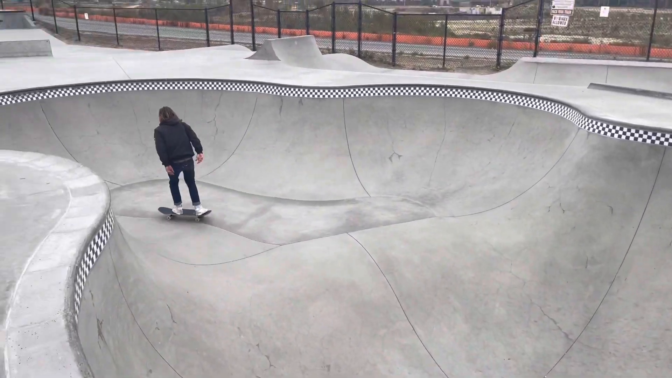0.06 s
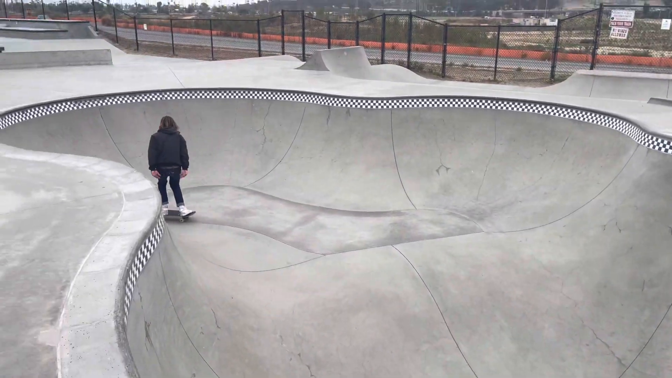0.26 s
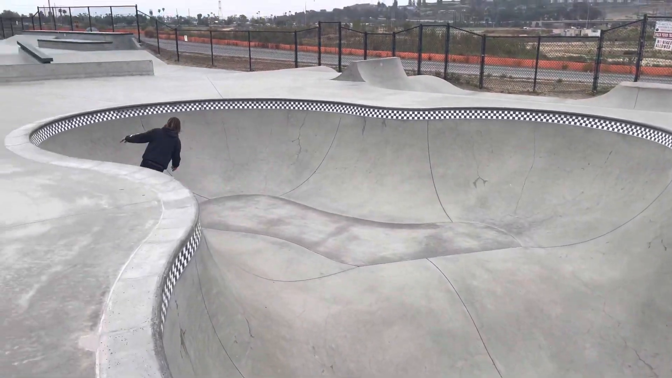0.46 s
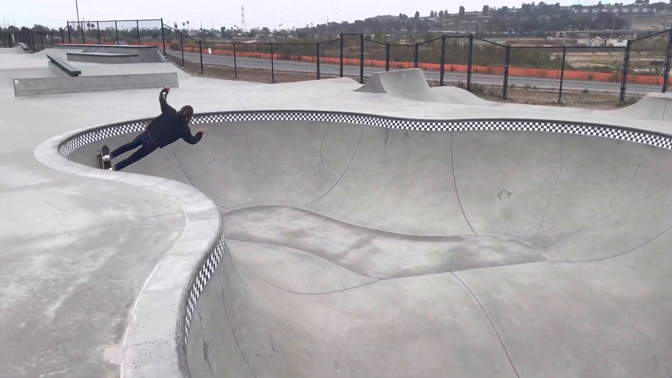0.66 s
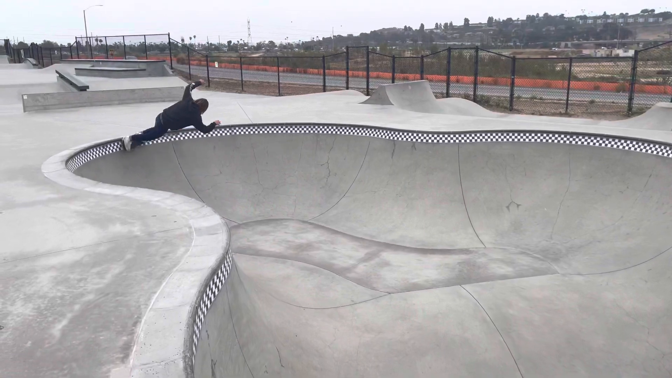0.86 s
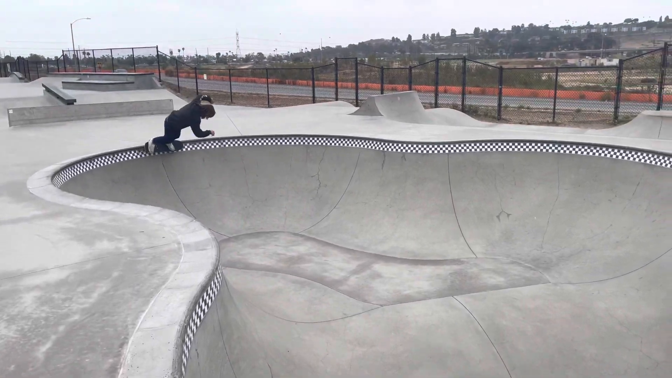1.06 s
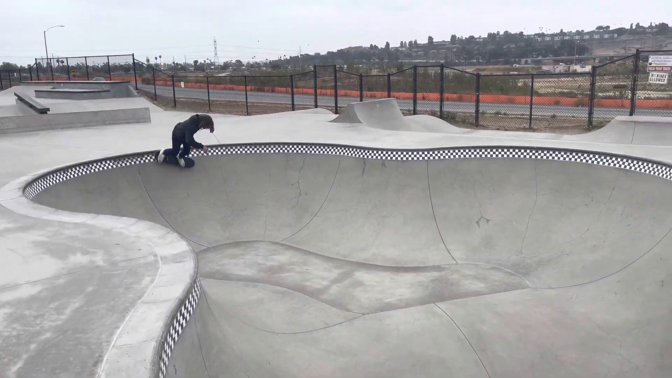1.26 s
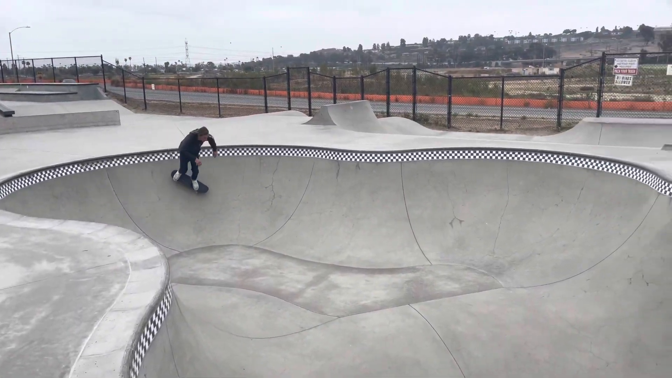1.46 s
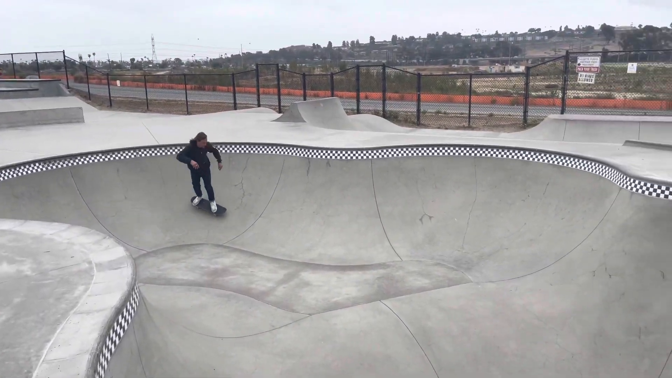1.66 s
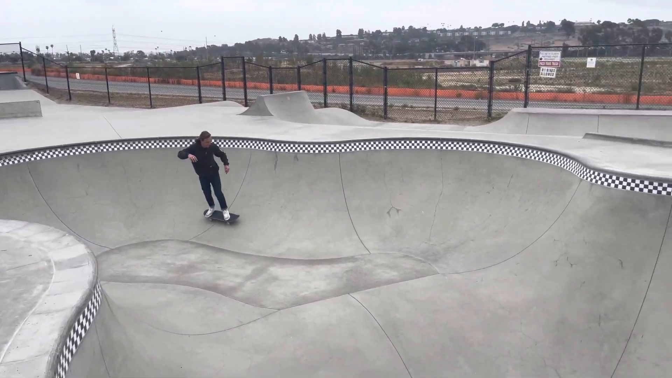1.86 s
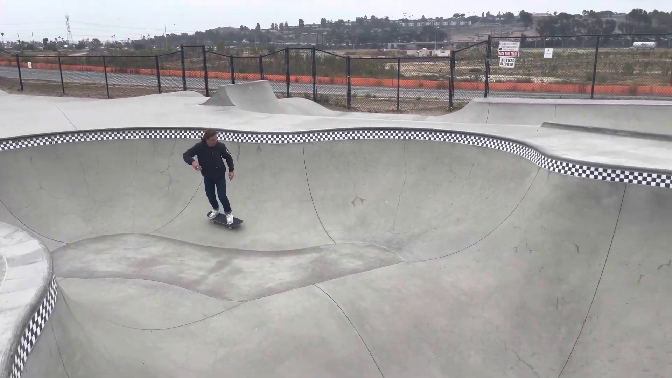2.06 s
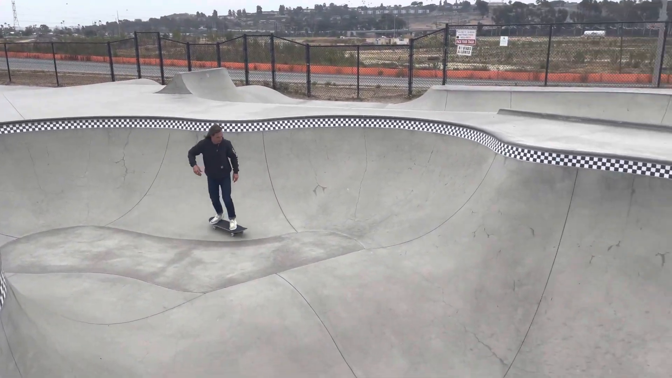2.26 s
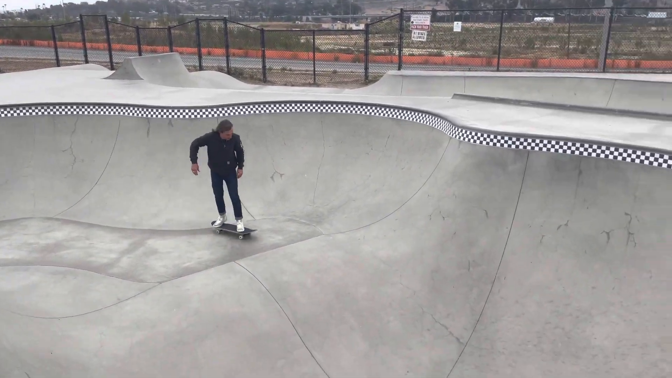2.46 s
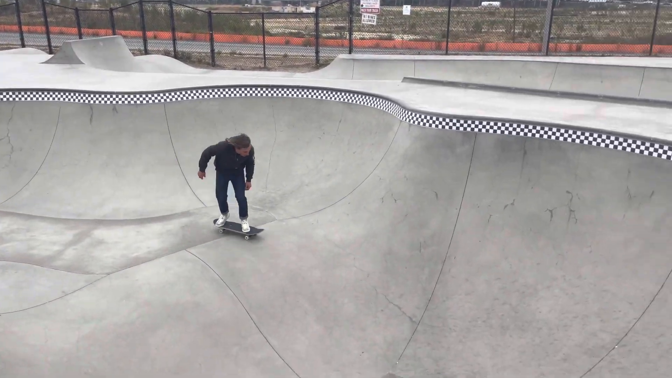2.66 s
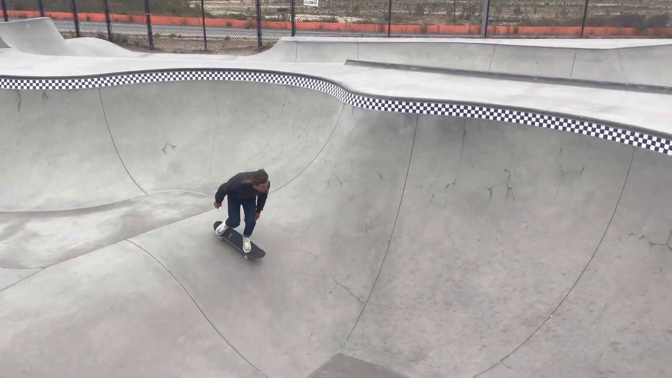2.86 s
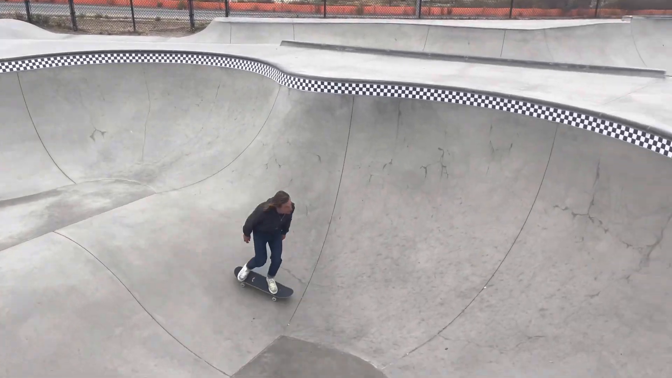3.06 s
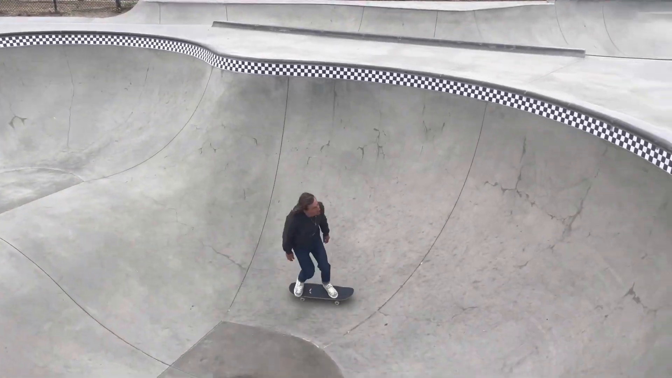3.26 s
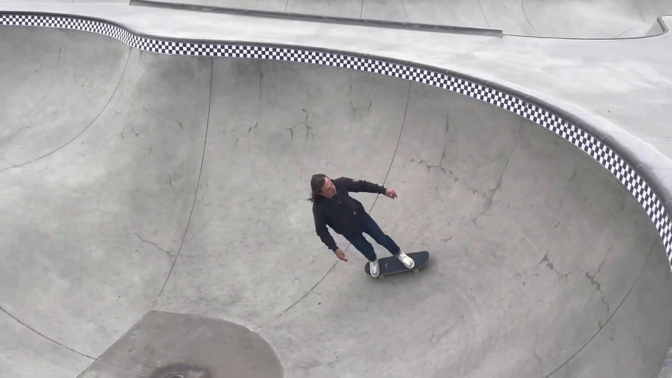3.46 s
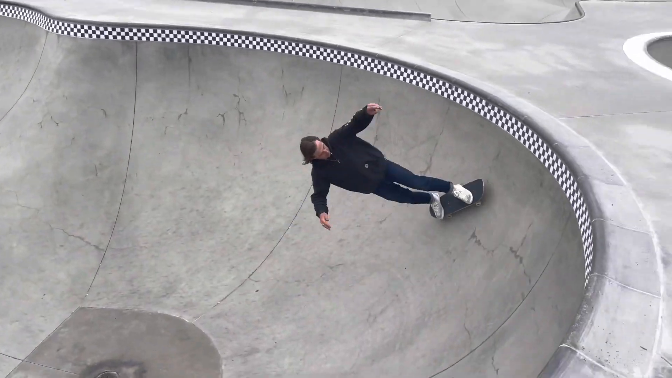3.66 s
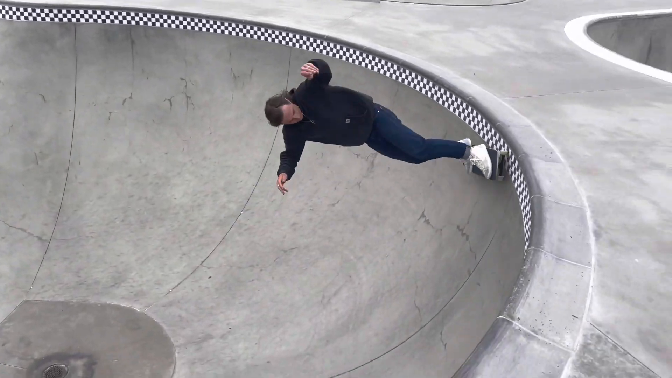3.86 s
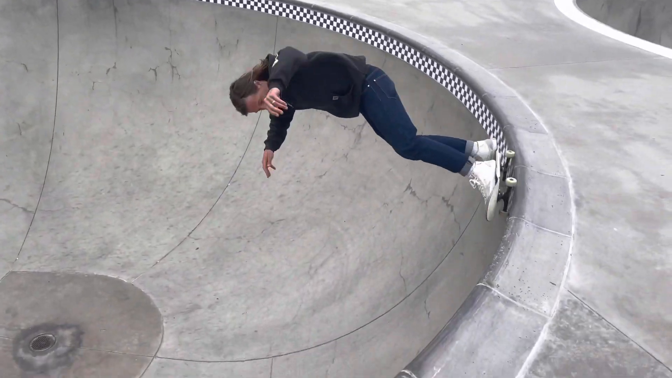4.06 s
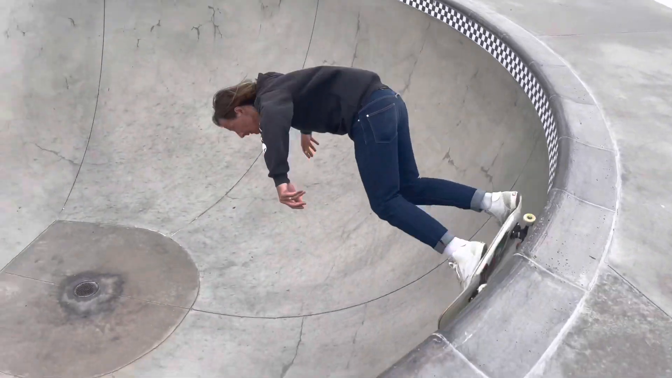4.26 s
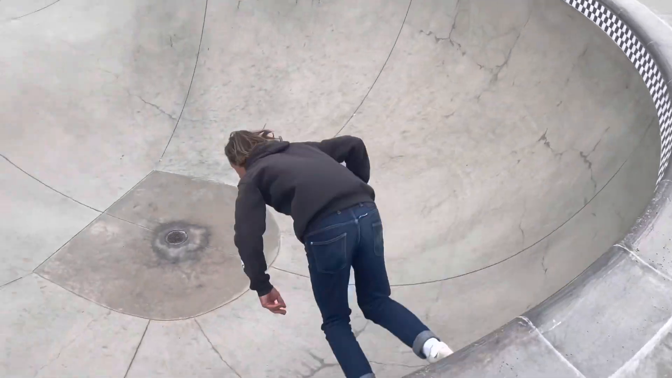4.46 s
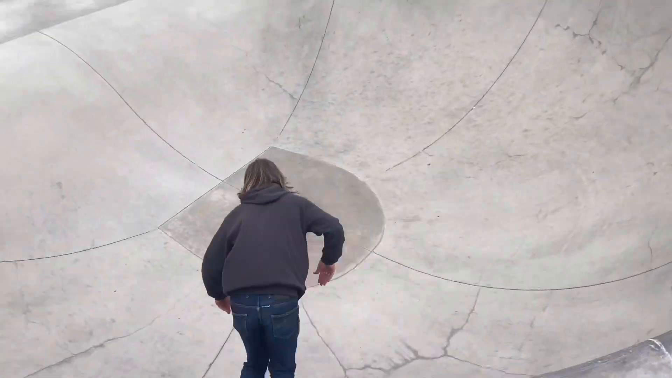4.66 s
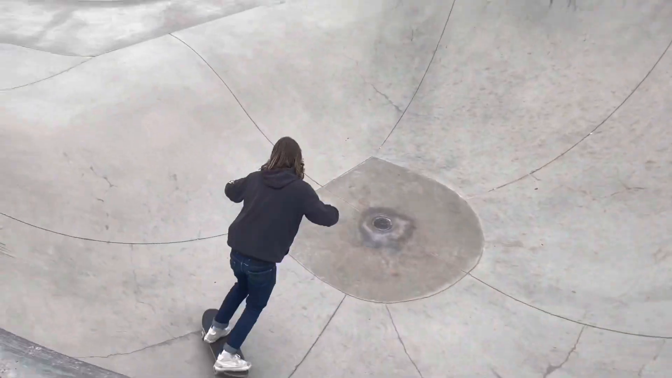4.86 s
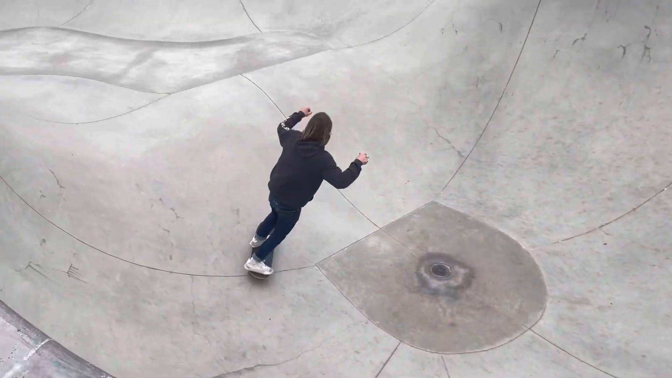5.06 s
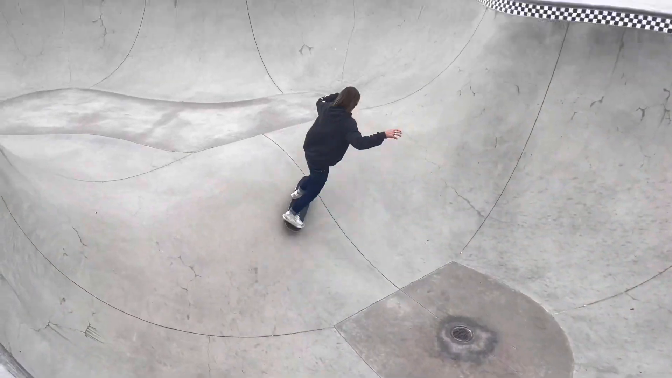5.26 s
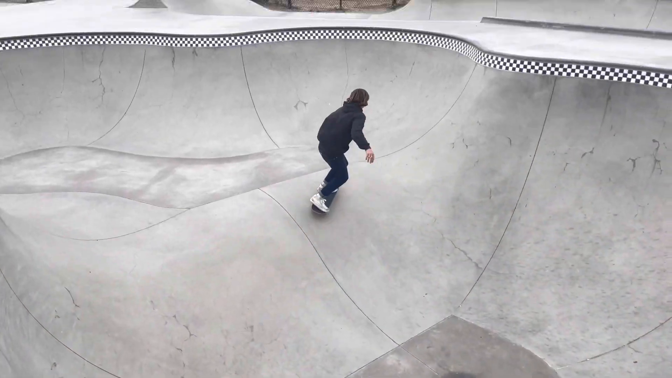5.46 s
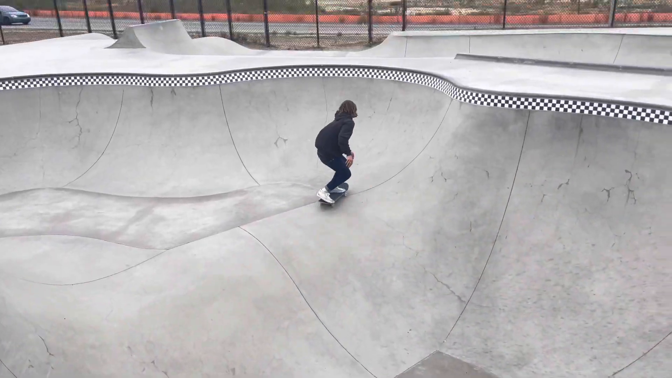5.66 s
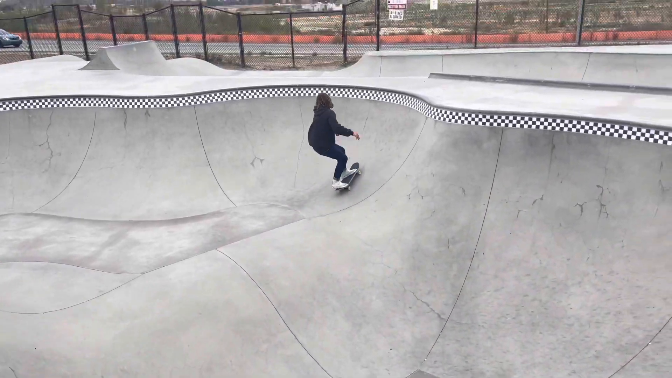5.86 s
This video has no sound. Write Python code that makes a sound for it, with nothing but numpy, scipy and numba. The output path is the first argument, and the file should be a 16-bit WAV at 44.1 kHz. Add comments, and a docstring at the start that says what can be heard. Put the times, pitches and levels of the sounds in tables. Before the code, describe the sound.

Skateboard wheels roll in a concrete bowl, rasp loudly along tiled coping at one second, then swell into knocks and a scrape around four.

```python
"""In a concrete bowl, a skateboard carves round below a hand-held phone.
Grit under the wheels shakes the deck and trucks (random taps through resonances); joints and coping
tiles knock them (short pushes through the same resonances); bearings and sliding urethane hiss.
The curved walls scatter the board's sound as dense echoes. A light wind buffets the two microphone ports
with rumble and puffs, over faint breathy whistles and a distant outdoor wash of noise."""
import sys
import numpy as np
from scipy import signal
from scipy.fft import rfft, irfft
from scipy.io import wavfile
from scipy.ndimage import uniform_filter1d, map_coordinates
from numba import njit

SR = 44100
rng = np.random.default_rng(int(sys.argv[2]) if len(sys.argv) > 2 else 0)


def unload_wav(signal):
    """Save mono or channel-first audio to the path in sys.argv[1] as 16-bit WAV at rate SR, clipped to [-1, 1]."""
    wavfile.write(
        sys.argv[1],
        SR,
        np.round(np.clip(np.atleast_2d(signal).T, -1, 1) * 32767).astype(np.int16),
    )


N = 260631
T = np.arange(N) / SR

# the board along the ride, before small trims: (t/s, low deck modes/dB, high deck modes/dB, trucks/dB)
RIDE = [(0.0, -36, -36, -40), (0.05, -40, -48, -46), (0.3, -39, -47, -40), (0.45, -39, -48, -46),
        (0.55, -35, -43, -42), (0.773, -35, -40, -38), (0.779, -24.5, -33.5, -35), (0.835, -26.5, -33, -33),
        (0.86, -22, -28, -28), (0.95, -21.5, -14.5, -31), (1.08, -18.5, -17.5, -18),
        (1.17, -20, -16.5, -26.5), (1.25, -35, -44, -40), (1.32, -34.5, -37, -36), (1.45, -30, -42, -38),
        (1.54, -30, -30, -33), (1.6, -32.5, -31, -31), (1.7, -29.5, -37, -38), (1.78, -33.5, -37, -35),
        (1.92, -37, -40, -42), (2.16, -36.5, -41.5, -46), (2.3, -34.5, -34.5, -38.5), (2.65, -44, -58, -54),
        (2.85, -28, -45, -45), (3.03, -28.5, -33, -33), (3.3, -26, -27.5, -29.5), (3.56, -24, -29, -31),
        (3.8, -28, -30.5, -29.5), (3.9, -25.5, -34, -28.5), (4.03, -25.5, -32, -28.5),
        (4.1, -20.5, -23.5, -23), (4.135, -21, -27, -26), (4.17, -18.5, -22, -25.5),
        (4.27, -28.5, -30.5, -30.5), (4.4, -34.5, -34.5, -43), (4.64, -37.5, -40, -44),
        (4.72, -36.5, -34, -41.5), (4.77, -31, -31.5, -42), (4.85, -30, -31, -38),
        (4.89, -28.5, -21.5, -40), (4.96, -21, -22.5, -39), (5.07, -22, -19, -31),
        (5.14, -19.5, -23.5, -34.5), (5.2, -23, -31, -36.5), (5.27, -26.5, -29, -29.5),
        (5.34, -25, -37, -35.5), (5.42, -27, -31, -35.5), (5.6, -37.5, -43, -37.5),
        (5.91, -31.5, -34.5, -34.5)]
# wheels over joints and edges: (t/s, blow level/dB, colour f/Hz)
KNOCKS = [(0.521, -27, 610), (0.778, -17, 850), (0.846, -18, 546), (0.862, -22, 590), (1.208, -12.5, 507),
          (1.218, -19, 600), (1.234, -19, 528), (1.27, -15.5, 630), (1.353, -13, 560), (1.365, -18, 545),
          (1.376, -15, 530), (1.413, -15, 527), (1.509, -20, 636), (1.534, -22, 830), (1.871, -23.5, 700),
          (1.954, -16, 745), (2.482, -22, 496), (2.76, -24, 610), (2.962, -16, 1300), (3.111, -29, 540),
          (3.153, -10, 870), (3.203, -6.5, 950), (3.208, -13, 1800), (3.275, -33, 641), (3.343, -10, 754),
          (3.408, -9, 750), (3.46, -14, 800), (3.485, -17, 850), (3.508, -15, 650), (3.525, -16, 690),
          (3.546, -14, 800), (3.568, -16, 1050), (3.709, -18, 993), (3.92, -10, 1450), (3.938, -20, 1450),
          (3.955, -10.5, 1530), (3.964, -8, 1510), (3.989, -9, 890), (4.006, -6.5, 800), (4.146, -8, 950),
          (4.152, -12, 1050), (4.18, -4.5, 1040), (4.302, -15, 1090), (4.325, -15, 476), (4.339, -25, 230),
          (4.358, -24, 597), (4.378, -24, 510), (4.39, -22, 445), (4.398, -20, 403), (4.432, -22, 496),
          (4.868, -23, 1070), (4.901, -17, 1020), (4.943, -21, 960), (4.962, -17, 950), (4.997, -17, 756),
          (5.040, -2, 930), (5.049, -24, 1040), (5.088, -15, 1160), (5.12, -24, 800), (5.157, -18, 700),
          (5.185, -23, 850), (5.215, -20, 754), (5.329, -37, 770), (5.387, -20, 780)]
# wheels rattling along the tile band, levels relative to the deck:
# (start t/s, end t/s, joints per second, blow level/dB, grit level/dB, colour f/Hz)
TILES = [(0.879, 0.905, 99, 8, -3, 650), (0.919, 1.04, 99, 12, -14, 730), (1.044, 1.18, 100, 10, -8, 690),
         (4.227, 4.28, 86, 15, -8, 820)]
# where the rider is: (t/s, left minus right level/dB, colour of the trucks f/Hz, colour of the scrub f/Hz)
PLACE = [(0, 4.5, 1330, 3470), (.8, 4.5, 1170, 4130), (1.1, 4.5, 1350, 6000), (1.3, 4, 1250, 3700),
         (2.3, 4, 1350, 3450), (2.9, 3.5, 1330, 4000), (3.33, 2, 1510, 3900), (3.47, 1.5, 1320, 3900),
         (3.6, 1.5, 1580, 4000), (3.72, 1, 1420, 4200), (3.95, 0.5, 1420, 4850), (4.3, 0.5, 1550, 3280),
         (4.8, 2.5, 1450, 4270), (5.15, 2.5, 1410, 4170), (5.27, 3, 1580, 4100), (5.5, 2.5, 1420, 3900),
         (5.91, 5.5, 1660, 4530)]
# resonances of the deck, of the trucks, and of the low boom: (f/Hz, width/Hz, level/dB)
DECK = [(503, 90, -3), (526.3, 45, 2), (617, 72, 1.5), (685, 64, 1), (784, 87, -1.5), (852, 44, -2),
        (955.6, 46, 2), (1047, 99, 1), (1230, 250, -8.5)]
TRUCKS = [(1238, 240, -5), (1440, 145, 0), (1616, 420, -4), (1865, 180, -2), (2026, 450, -8),
          (2520, 380, -8)]
BOOM = [(197, 70, -1), (276, 86, 1.5), (345, 160, -0.5), (472, 23, -11.5)]


def undb(db):
    """Turn decibels into a factor for the amplitude."""
    return 10 ** (np.asarray(db) / 20)


def level(x, db):
    """Scale a sound so that its average (RMS) level is db."""
    return x * undb(db) / np.sqrt(np.mean(x ** 2))


def curves(table):
    """Join the points of a table with straight lines over time, one curve per column."""
    s, *columns = np.transpose(table)
    return [np.interp(T, s, column) for column in columns]


def walk(rate):
    """Wandering random levels: each is held 1 / rate s, then smoothed twice; the spread is near 1."""
    hold = int(SR / rate)
    steps = np.repeat(rng.standard_normal(N // hold + 1), hold)
    return 1.82 * uniform_filter1d(uniform_filter1d(steps, hold), hold)[:N]


@njit
def svf(x, hz, width):
    """State-variable band-pass with moving centre and width in Hz, gain 1 at the centre."""
    y, band, low = np.empty(len(x)), 0., 0.
    for i in range(len(x)):
        g, k = np.tan(np.pi * hz[i] / SR), width[i] / hz[i]
        v = (band + g * (x[i] - low)) / (1 + g * (g + k))
        band, low, y[i] = 2 * v - band, low + 2 * g * v, k * v
    return y


def ring(x, modes, turn=-1):
    """Let x ring (Hz, width Hz, dB) modes; each next one is multiplied by turn, so -1 alternates the sign."""
    out = 0
    for k, (hz, width, db) in enumerate(modes):
        b, a = signal.iirpeak(hz, hz / width, SR)
        out = out + turn ** k * undb(db) * signal.lfilter(b, a, x)
    return out


def coloured(points):
    """Noise with a spectrum that follows (Hz, dB) points, very weak below the first."""
    hz, db = np.transpose(points)
    f = np.maximum(np.arange(N // 2 + 1) * SR / N, 1)
    gain = undb(np.interp(np.log(f), np.log(hz), db, left=-60))
    return irfft(rfft(rng.standard_normal(N)) * gain, N)


def wash():
    """Far-off outdoor noise, differently coloured at each port, that swells a little."""
    # spectrum at the left and right port: (f/Hz, level per Hz/dB)
    left_colour = [(100, -35), (300, 4), (650, 12), (1300, 5), (2100, -80), (3100, -2), (4500, -7.5),
                   (5700, -6), (7200, -13.5), (9000, -29), (10800, -41), (12300, -43)]
    right_colour = [(100, -18), (300, 7), (650, -29), (1300, 2.5), (2100, -0.5), (3100, -15), (4500, -7),
                    (5700, -36), (7200, -13.5), (9000, -45), (10800, -1), (12300, -33)]
    noise = np.array([coloured(left_colour), coloured(right_colour)])
    return level(noise, -38) * undb(2.9 * walk(2.48))


def rumble():
    """Low wind noise for one port: random air pressure in broad bass bands, with a flickering level."""
    air = rng.standard_normal(N) * undb(0.54 * walk(14))
    bass = ring(air, [(53.5, 54, -0.33), (111, 181, -0.6)])
    return level(ring(bass, [(79.4, 254, 0)]), 8.4)


def wind():
    """Air buffets the ports: rumble only partly alike on the two, and single puffs of one or two cycles."""
    # strength of the rumble, before its own level: (t/s, level/dB)
    wind_levels = [(0.0, -46.5), (0.76, -54), (1.27, -46.5), (2.11, -45.5), (2.34, -44.5), (2.6, -48),
                   (3.16, -46), (3.52, -44), (4.39, -49.5), (5.61, -42), (5.91, -49)]
    # puffs on the ports: (centre t/s, level/dB, pitch f/Hz, left minus right level/dB)
    puffs = [(0.035, -25, 380, -5), (0.101, -35, 185, -1), (0.123, -27.5, 216, 1), (0.149, -29.5, 69.6, 3),
             (1.822, -29, 166, -14), (2.383, -34, 198, -22), (2.507, -18.5, 213, 3), (2.517, -25, 170, 2),
             (2.61, -34, 110, -5), (2.652, -26, 199, 1), (2.752, -21.5, 418, 13), (2.77, -21, 310, -11),
             (2.789, -21, 80, 6), (2.81, -31, 130, -2), (2.865, -23, 119, 7), (2.884, -29, 720, 2),
             (3.099, -22.5, 126, 1), (3.216, -33, 130, -20), (3.393, -12.5, 260, 2), (3.465, -29, 85, 17),
             (3.506, -19, 185, 6), (3.535, -21, 174, 2), (3.635, -19.5, 206, 0), (3.826, -26, 170, 9),
             (3.852, -22, 223, 2), (5.463, -25, 119, 1), (5.501, -17.5, 272, 7), (5.591, -20, 216, 7),
             (5.652, -29, 230, 6), (5.717, -27.5, 94, 7)]
    gust_db, gust_s = -25.5, 0.02  # extra rumble around each puff, relative to it
    puff_phase_rad, port_phase_rad = 2.2, .45  # a puff pushes, then pulls harder; spread between the ports
    out = np.array([rumble() for _ in range(2)])
    # part of the rumble pushes one port as it pulls the other
    out = out - 0.083 * out[::-1]
    gusts = sum(undb(db + gust_db) * np.exp(-((T - s) / gust_s) ** 2) for s, db, _, _ in puffs)
    out = out * (undb(curves(wind_levels)) + gusts)
    chance = rng.standard_normal((len(puffs), 2))
    for (s, db, hz, pan_db), turn in zip(puffs, chance):
        i = slice(max(int((s - .04) * SR), 0), int((s + .04) * SR))
        cycles = hz * (T[i] - s)
        phase = puff_phase_rad + port_phase_rad * turn[:, None]
        puff = np.cos(2 * np.pi * cycles + phase) * np.exp(-(cycles / 0.62) ** 2)
        out[:, i] += undb(db + np.array([[pan_db], [-pan_db]]) / 2) * puff
    return out


def whistles():
    """Faint breathy whistles, stronger on the left: air noise in narrow resonances that fade and waver."""
    # each whistle; the fades reach a little past its times, and the level is before a small trim:
    # (start t/s, end t/s, f/Hz, width/Hz, level/dB)
    whistle_list = [(0, 0.16, 3430, 50, -41), (.2, .55, 3440, 25, -48), (.15, .65, 3820, 45, -50),
                    (.2, .7, 2890, 35, -56), (.2, .6, 1920, 50, -61), (0, .8, 6780, 90, -54),
                    (.1, .8, 4300, 50, -54), (0.198, .8, 5450, 100, -53), (1.3, 2.2, 3110, 59.5, -45.5),
                    (1.296, 2.277, 3860, 60, -47), (1.403, 2.2, 3395, 50, -44), (1.698, 2.6, 3620, 30, -55),
                    (1.302, 1.698, 6770, 50, -51.5), (1.7, 2.6, 6180, 50, -56),
                    (1.7, 2.4, 5340, 200, -53.5), (2.1, 2.3, 2950, 90, -50), (2.3, 2.95, 3770, 50, -55),
                    (2.403, 2.803, 3080, 150, -48.5), (3.096, 3.696, 3090, 260, -45.5),
                    (3.147, 3.502, 3810, 200, -42.5), (2.89, 3.4, 4650, 50, -64),
                    (2.9, 3.805, 5160, 160, -53), (4.35, 4.9, 4730, 50, -53),
                    (4.803, 5.15, 6030, 300, -47.5), (5.296, 5.898, 3660, 60, -48.5),
                    (5.4, 5.902, 4750, 70, -49.5), (5.5, 5.9, 5350, 90, -52)]
    out, noise = np.zeros((2, N)), rng.standard_normal((2, N))
    waver = undb(1.5 * walk(12.5))
    for start, end, hz, width, db in whistle_list:
        i = slice(max(int((start - .1) * SR), 0), int((end + 0.18) * SR))
        fade = np.clip(np.minimum(T[i] - start + 0.17, end + 0.15 - T[i]) / 0.24, 0, 1)
        # shifting the waver by the pitch gives each whistle a different part of it
        own_waver = np.roll(waver, int(hz) * 37)[i]
        tone = level(ring(noise[:, i], [(hz, width, 0)]), db - 0.6)
        out[:, i] += fade * own_waver * tone * undb([[0], [-4.5]])
    return out


def bowl(x, pan_db, wet_db, t60_s=0.039, lag_per_db=2.5, count=24):
    """Sound reaches the nearer port first; curved walls send each port dense echoes that keep changing."""
    # the right port hears it later by lag_per_db samples for each dB of pan
    late = map_coordinates(x, [np.arange(N) - lag_per_db * pan_db], order=3, mode="nearest")
    direct = np.array([x, late])
    # one random echo pattern for each stretch of the ride, dying by 60 dB in t60_s
    t, hop = np.arange(4096) / SR, N // count + 1
    fade = np.exp(-np.log(1000) * t / t60_s) * (1 - np.exp(-t / 0.000074))
    echoes = rng.standard_normal((count + 1, 2, 4096)) * fade
    echoes *= undb(wet_db) / np.sqrt(np.sum(echoes ** 2, axis=2, keepdims=True))
    padded, wet = np.pad(x, (hop, 2 * hop)), np.zeros((2, N + 3 * hop + 4096))
    # overlapping pieces fade from one echo pattern to the next
    window = np.sin(np.pi * np.arange(2 * hop) / (2 * hop))
    for k, echo in enumerate(echoes):
        piece = padded[k * hop:(k + 2) * hop] * window
        wet[:, k * hop:(k + 2) * hop + 4095] += signal.fftconvolve(piece[None], echo, axes=1)
    return (direct + wet[:, hop:hop + N]) * undb(np.array([pan_db, -pan_db]) / 2)


def tile_blows():
    """Evenly laid tiles give a blow at every joint, slightly uneven in time and strength."""
    blows = []
    for start, end, rate, db, _, hz in TILES:
        chance = rng.standard_normal((32, 2))
        s = start + np.arange(32) / rate + 0.0005 * chance[:, 0]
        ride_s, deck_db = np.transpose(RIDE)[:2]
        size = np.interp(s, ride_s, deck_db) + db + 1.0 * chance[:, 1]
        blows += [(a, b, hz) for a, b in zip(s, size) if a < end]
    return blows


def knocks(blows, ring_s, treble_db, width):
    """Each blow starts all modes of the board in step, coloured by where it lands, with a burst of grit."""
    out, t = np.zeros(N + 2048), np.arange(2048) / SR
    # urethane wheels give a little, so the push takes 0.6 ms
    push = np.sin(np.pi * np.minimum(t / .0006, 1))
    body = ring(push, BOOM + DECK + TRUCKS, turn=1.0) * np.exp(-t / ring_s)
    chance = rng.standard_normal((len(blows), 2048))
    for (s, db, hz), noise in zip(blows, chance):
        # width is the band of modes the blow favours, as a share of its colour
        blow = ring(body, [(hz, width * hz, 0)])
        blow = ring(blow, [(hz, 1.1 * hz, 0)])
        crack = ring(noise, [(7000, 15000.0, 0)]) * np.exp(-t / 0.0025)
        i = int(s * SR)
        out[i:i + 2048] += undb(db) * (blow / abs(blow).max() + undb(treble_db) * crack)
    return out[:N]


def shudder():
    """The deck rattles on: extra grit drive that builds just after each knock and dies away."""
    shudder_db, fall_s, rise_s = -18, 0.0071, 0.0027  # level relative to the knock
    out = 0
    for s, db, _ in KNOCKS:
        t = np.maximum(T - s, 0)
        out = out + undb(db + shudder_db) * np.exp(-t / fall_s) * (1 - np.exp(-t / rise_s))
    return out


def grit(per_s, spread_db):
    """Grains of the concrete passing under the wheels: random taps, some larger, up to a limit."""
    hit = rng.random(N) < per_s / SR
    sign, size = rng.standard_normal(N), rng.exponential(1, N)
    return hit * sign * undb(spread_db * np.minimum(size, 2.6))


def deck_sound(taps, shake):
    """Grit shakes the deck's modes; the side of the board that faces the phone sounds loudest."""
    # the part of the deck that sounds loudest as the board turns: (t/s, centre f/Hz, width/Hz)
    face = [(0, 700, 900), (.3, 666, 350), (.78, 680, 600), (.85, 590, 350), (.97, 720, 480),
            (1.15, 700, 600), (1.4, 580, 400), (1.55, 710, 500), (1.68, 640, 450), (1.8, 760, 500),
            (2.3, 660, 450), (2.7, 735, 700), (3.1, 770, 580), (3.27, 795, 550), (3.44, 870, 550),
            (3.52, 736, 500), (3.63, 890, 600), (3.75, 870, 600), (3.87, 630, 400), (4.17, 970, 606),
            (4.4, 565, 600), (4.83, 640, 506), (4.95, 960, 330), (5.07, 950, 420), (5.14, 860, 450),
            (5.21, 780, 600), (5.42, 840, 500), (5.91, 820, 800)]
    low_db, high_db, _ = curves(RIDE)
    low = ring(taps, DECK[:5])
    high = ring(0.33 * taps + grit(3000, spread_db=1.5), DECK[5:])
    deck = (undb(low_db) + shake) * level(low, -2.55)
    deck = deck + (undb(high_db) + 0.39 * shake) * level(high, -0.45)
    face_hz, face_width = curves(face)
    # a small share of the whole deck is heard as well
    return 0.19 * deck + svf(deck, face_hz, face_width)


def trucks_sound(taps, shake):
    """Grit shakes the metal trucks: lower modes with a moving colour, and a rasp of the upper modes."""
    # rasp of the upper truck modes, before a small trim: (t/s, level/dB)
    rasp_levels = [(0, -52), (.5, -57), (.76, -50), (.99, -39), (1.03, -32.5), (1.16, -30.5), (1.25, -62),
                   (2.3, -50), (2.95, -46), (3.3, -67), (3.6, -43), (3.85, -53), (4.15, -27.5), (4.3, -43),
                   (4.5, -46), (5.05, -42), (5.4, -49), (5.91, -48)]
    trucks_db, trucks_hz = curves(RIDE)[2], curves(PLACE)[1]
    # the trucks also feel grains that the deck does not
    grains = 0.59 * taps + grit(2500, spread_db=1.5)
    trucks = ring(grains, TRUCKS[:3])
    trucks = 0.17 * trucks + svf(trucks, trucks_hz, np.full(N, 264.0))
    rasp = ring(ring(grains, TRUCKS[3:], turn=0.36), [(2040, 1700, 0)])
    trucks = (undb(trucks_db) + 1.4 * shake) * level(trucks, -0.02)
    return trucks + (undb(curves(rasp_levels)[0]) + 0.65 * shake) * level(rasp, 0.1)


def hiss_sound():
    """Fine grit makes the sliding urethane scrub and the bearings hiss, each in its own treble resonances."""
    # strength of both, before small trims: (t/s, scrub level/dB, bearing level/dB)
    hiss_levels = [(0.0, -47, -53), (0.3, -58, -53), (0.74, -46.5, -59.5), (0.8, -40, -48),
                   (0.99, -43, -50), (1.1, -33.5, -38), (1.27, -49.5, -52), (1.52, -45.5, -49.5),
                   (2.3, -63, -56.5), (2.86, -46.5, -52.5), (3.15, -45.5, -43), (3.36, -42, -44),
                   (3.55, -37.5, -37.5), (3.78, -43.5, -44), (3.95, -35, -31.5), (4.05, -34, -27),
                   (4.17, -28, -22.5), (4.26, -38, -32.5), (4.4, -51.5, -52.5), (4.66, -48.5, -54),
                   (4.96, -44, -40.5), (5.2, -49, -49.5), (5.42, -45, -46), (5.68, -52.5, -52),
                   (5.91, -37.5, -43.5)]
    # resonances of the scrub and of the bearings: (f/Hz, width/Hz, level/dB)
    scrub_modes = [(2600, 490, 7), (3696, 1900, -4), (3980, 1900, 0), (4620, 720, 0), (5530, 610, 7),
                   (5980, 700, -2.5)]
    bearing_modes = [(7740, 1000, -13.5), (7910, 520, -2.5), (9710, 1530, 2), (11340, 1370, 4),
                     (11800, 1400, -11)]
    scrub_db, bearing_db = curves(hiss_levels)
    scrub_hz = curves(PLACE)[2]
    fine = grit(9000, spread_db=1.5) * undb(.8 * walk(18) + 1.2 * walk(50))
    # each scrub resonance swells and fades on its own
    scrub = sum(ring(fine, [mode]) * undb(0.5 * walk(14.0)) for mode in scrub_modes)
    scrub = ring(scrub, [(4300, 3200, 0)])
    scrub = 2.1 * scrub + svf(scrub, scrub_hz, np.full(N, 990.0))
    drive = (fine + grit(6000, spread_db=3.0)) * undb(0.32 * walk(24.37))
    bearings = ring(ring(drive, bearing_modes), [(10150, 7600, 0)])
    return undb(scrub_db) * level(scrub, -0.042) + undb(bearing_db) * level(bearings, 1.37)


def boom_sound():
    """Grit excites low resonances: a boom that wavers in strength while its colour moves."""
    # strength, before a small trim, and colour of the boom: (t/s, level/dB, centre f/Hz)
    boom_levels = [(0.0, -34, 277), (0.28, -56, 282), (0.749, -49.5, 250), (1.0, -32.5, 205),
                   (1.12, -27, 188), (1.3, -39.5, 228), (1.6, -42.5, 239), (2.75, -46, 292),
                   (3.3, -37, 316), (3.55, -36, 325), (3.75, -44, 302), (4.15, -34, 290), (4.24, -29, 280),
                   (4.29, -35, 282), (4.325, -29.5, 220), (4.405, -28, 252), (4.42, -39, 260),
                   (4.7, -39, 230), (5.12, -34, 237), (5.4, -42.5, 253), (5.91, -43, 254)]
    boom_db, boom_hz = curves(boom_levels)
    boom = svf(ring(grit(1600, spread_db=0.5), BOOM), boom_hz, np.full(N, 240.))
    return undb(boom_db) * level(boom * undb(1.6 * walk(13)), -2.25)


def rolling():
    """The wheels roll over grit: deck, trucks, hiss and boom follow the strength of the ride."""
    # mostly dips as the wheels go light for a moment, with a few brief swells:
    # (middle t/s, half length/s, level change/dB)
    lifts = [(1.197, 0.01, -4), (1.257, 0.0089, 5), (1.336, 0.011, 2), (1.407, 0.023, -2),
             (1.427, 0.023, -1), (1.838, 0.028, -1.5), (1.922, 0.026, -2), (1.997, 0.026, -3),
             (2.73, 0.01, -6), (2.805, 0.018, -1), (3.12, 0.012, 0.5), (3.19, 0.013, -1),
             (3.234, 0.0089, -6.5), (3.4, 0.0064, 0), (3.822, 0.033, -4.5), (4.211, 0.021, -9),
             (4.294, 0.0046, -25), (4.313, 0.006, -2), (4.417, 0.0059, -8), (4.862, 0.01, -2),
             (5.036, 0.0095, -2.5), (5.274, 0.023, -1.5), (5.367, 0.018, -5.5)]
    lift_db = sum(db * np.exp(-((T - s) / half) ** 2) for s, half, db in lifts)
    # on the smooth tiles the wheels meet less grit
    smooth = undb(sum(db * (T > start) * (T < end) for start, end, _, _, db, _ in TILES))
    taps = grit(3000, spread_db=1.5) * undb(0.44 * walk(60) + 1.27 * walk(25))
    shake = shudder()
    body = smooth * deck_sound(taps, shake) + trucks_sound(taps, shake)
    return undb(lift_db) * body + undb(0.74 * lift_db) * hiss_sound() + boom_sound()


def scene():
    """Add the wash, the wind and the whistles to the board's blows and rolling in the bowl."""
    pan_db = curves(PLACE)[0]
    # treble_db sets the burst of grit relative to the blow
    blows = knocks(KNOCKS, ring_s=.006, treble_db=-22, width=.55)
    blows = blows + knocks(tile_blows(), ring_s=.009, treble_db=-24, width=.38)
    board = bowl(blows, pan_db, wet_db=-4.0) + bowl(rolling(), pan_db, wet_db=-4.0)
    return wash() + wind() + whistles() + board


def record(dry):
    """In the treble one port feeds most of both channels, with a turning phase; peaks round, the top is cut."""
    # phase by which the right channel leads in the treble: (f/Hz, phase/half turns)
    phase_turn = [(8800, 0), (9800, .98), (10300, 1.02), (11800, 2)]
    # the left port is weaker here: (f/Hz, half width/Hz, level/dB)
    port_dip = (1230, 690, -2.15)
    left, right = rfft(dry)
    f = np.arange(len(left)) * SR / N
    dip_hz, dip_width, dip_db = port_dip
    left = left * undb(dip_db * np.exp(-((f - dip_hz) / dip_width) ** 2))
    # each channel is turned by half of the phase, in opposite directions
    half = np.interp(f, *np.transpose(phase_turn)) * np.pi / 2
    alike = .7  # how much the side signal resembles the left port
    mid = left * np.cos(half)
    side = -1j * np.sin(half) * (alike * left + np.sqrt(1 - alike ** 2) * right)
    share = np.clip((f - 7600) / 1000, 0, .88)
    both = (1 - share) * np.array([left, right]) + share * np.array([mid + side, mid - side])
    # the microphone is weak in the deepest bass and falls away at the top of the treble
    both = both / np.sqrt((1 + (f / 11900) ** 36) * (1 + (38 / (f + 1)) ** 4))
    rounded = np.tanh(0.85 * irfft(both, N)) / 0.76
    top_cut = signal.ellip(8, .2, 70, 12600, fs=SR, output="sos")  # cut above 12600 Hz
    return signal.sosfilt(top_cut, rounded)


dry = scene()
out = record(dry)
unload_wav(out)
```